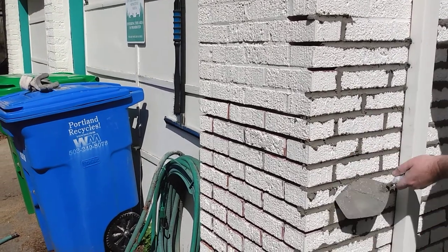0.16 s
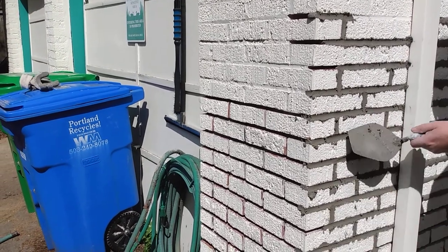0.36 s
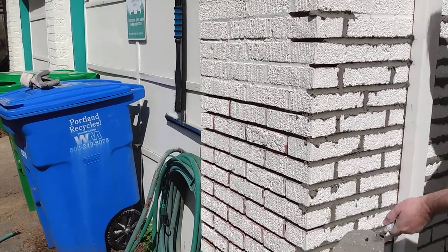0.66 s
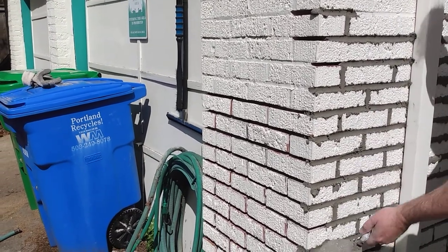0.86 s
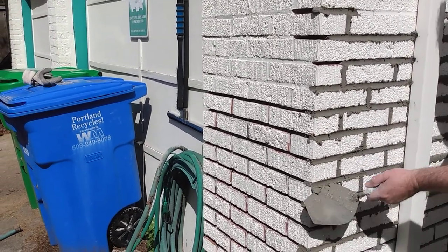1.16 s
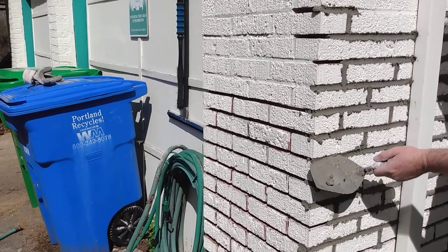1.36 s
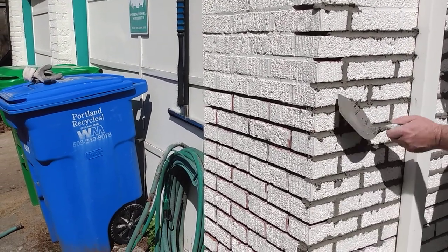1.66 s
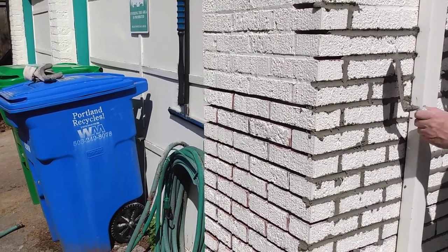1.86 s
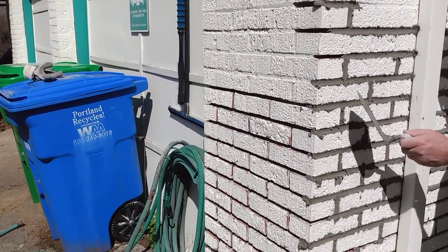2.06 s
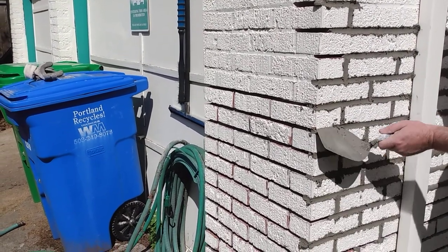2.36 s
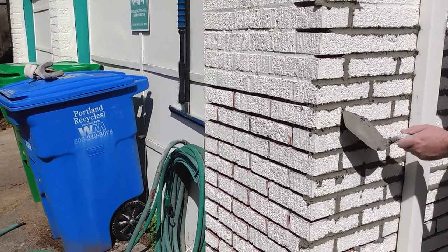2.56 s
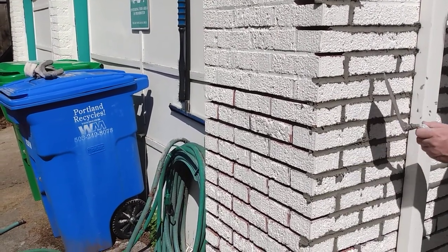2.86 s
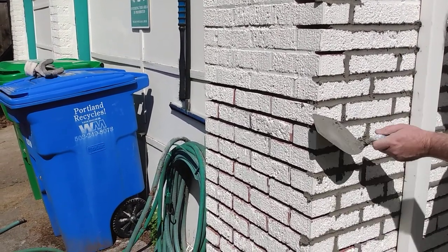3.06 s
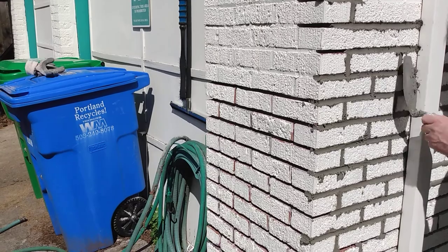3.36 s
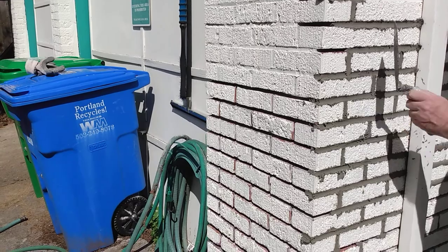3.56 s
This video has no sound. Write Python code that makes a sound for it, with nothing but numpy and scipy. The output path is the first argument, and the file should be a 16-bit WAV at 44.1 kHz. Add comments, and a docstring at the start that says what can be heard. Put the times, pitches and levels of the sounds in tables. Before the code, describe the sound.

A steel trowel scrapes hard mortar at once, hissing grittily, with a sharp catch near 0.36 s. Short strokes with clicks and quick metallic rings follow from 0.9 to 1.4 s and 1.55 to 1.9 s. After a short lull, scrapes resume at 2.3 to 2.85 s. Another lull leads to the loudest rasp around 3.25-3.45 s, then loose mortar slides off. Faint distant traffic hums throughout; close stereo, outdoors.

```python
"""A gritty hiss starts at once: a steel trowel scrapes mortar joints of a brick wall outdoors, in short strokes.
Random breaking sand grains make the hiss and also drive the modes of the blade. At each catch on a lump
the grinding jumps up and the blade rings short and clear, as decaying sine tones. Near the end loose mortar
slides off, as noise through two fading resonances. Far traffic, made of filtered noise, hums underneath."""
import sys
import numpy as np
from scipy import signal
from scipy.fft import rfft, irfft, next_fast_len
from scipy.io import wavfile
from scipy.ndimage import uniform_filter1d

SR = 44100
rng = np.random.default_rng(int(sys.argv[2]) if len(sys.argv) > 2 else 0)


def natural_amplitude(level_db):
    """Convert a level in decibels to a linear amplitude factor, elementwise."""
    exponent = np.asarray(level_db, float) / 20
    return 10 ** exponent


def unload_audio(sound):
    """Save the sound as a 16-bit wav file, at the path given as the first command line argument."""
    columns = np.transpose(np.atleast_2d(sound))
    # keep every value between -1 and 1, then stretch to whole-number steps
    steps = np.round(np.clip(columns, -1, 1) * 32767)
    wavfile.write(sys.argv[1], SR, steps.astype(np.int16))


N = 163170  # length [samples]

# Far traffic wash, its tone colour: (frequency [Hz], relative level [dB])
WASH_COLOUR = [(18, -57), (30, -16), (71, 0), (184, -14), (866, -15), (1540, -27.5), (7000, -52),
               (10500, -44), (13700, -49), (16000, -52)]
# How alike the wash is left and right: (frequency [Hz], likeness [0 to 1])
WASH_LIKENESS = [(70, .7), (200, .9), (600, .6), (1500, .1)]
WASH_DB = -51.5
HUM_HZ, HUM_WIDTH_HZ, HUM_DB = 66, 12, -57  # an engine idles far off

# Trowel level at the two microphone ports: (frequency [Hz], left minus right [dB])
PORT_LEAN = [(60, 5), (380, -2), (2380, 5), (9000, -5.5), (14000, -1)]
# Trowel phase at the two ports: (frequency [Hz], lead of the left port [radians])
PORT_LEAD = [(520, .3), (1250, 1.9), (2500, 1.4), (3450, 3.1), (4050, 5.1), (5430, 6), (8610, 4.6),
             (12000, 5.6), (16000, 8)]
ECHO_DB, ECHO_T60_S, ECHO_START_S = -6.5, .03, .0015

# Loose mortar sliding off the blade: (frequency [Hz], width [Hz], level [dB], time to fade 60 dB [s])
MORTAR_FALL = [(1100, 700, -44, .2), (1900, 1200, -44, .1)]
FALL_S, FALL_RISE_S = 3.483, .004

# Strokes, each a list of points: (time [s], grit hiss [dB], blade ring over grit [dB])
STROKES = [
    [(0, -47.5, 8.5), (.27, -48, 8.5), (.31, -61.5, 18), (.44, -63.5, 15)],
    [(.452, -56, 4.5), (.53, -57.5, 5), (.54, -69.5, -19), (.92, -75.5, -24)],
    [(.925, -57, -0.5), (1.0, -52, 10), (1.2, -71.5, 22.5), (1.42, -57.5, 7.5), (1.52, -62.5, -4)],
    [(1.545, -75.5, 20.5), (1.75, -53, 8), (1.83, -37, -2.5), (1.88, -66.5, 18.5), (1.97, -76, 15.5)],
    [(1.985, -65, 0), (2.01, -56, -22.5), (2.1, -96, 21)],
    [(2.325, -56, 0), (2.42, -49, 8), (2.525, -45, -13), (2.545, -66, 18.5), (2.61, -43, 3),
     (2.72, -79, 13.5)],
    [(2.725, -100, -3), (2.76, -61.5, 22.5), (2.82, -59.5, 20), (2.88, -84, 11)],
    [(3.24, -67, 17), (3.3, -47.5, 11.5), (3.4, -30.5, 3), (3.44, -33.5, 2), (3.47, -58.5, 20.5),
     (3.5, -66, 10)],
]
# How the blade lies on the wall, one row a stroke, against the middle modes:
# (low modes [dB], top modes [dB], low bending [dB], grit treble [dB])
GRIPS = [(0.5, -22.5, -2.5, -3), (-3, -0.5, 3, -0.5), (6.5, -31, -1.5, -1.5), (0, -12, -2, 0.5),
         (22, -4, 9, 9.5), (1.5, -4.5, -3, 7.5), (1.5, -13.5, -14, -6.5), (3.5, -7.5, -12, -5.5)]
# Pitches between which the grip blends from low modes to top modes: (frequency [Hz])
GRIP_HZ = (1200, 1772, 2600, 3800)
# The edge catches on a lump: (time [s], crack [dB], ring over crack [dB],
# time for the crumble to fade 60 dB [s], pitch of the modes struck most [Hz])
CATCHES = [(0.1341, -32.5, -3, 0.046, 1772), (0.2057, -38, 6, 0.061, 1772),
           (0.2782, -29.5, -6.5, 0.034, 2480), (0.3298, -34, -1.5, 0.032, 3830),
           (0.3594, -23, -1, 0.025, 1772), (0.359, -38.5, 15.5, 0.029, 1066), (0.9313, -33, -4, 0.03, 4430),
           (0.9863, -40, 8, 0.079, 1820), (1.012, -41.5, 16.5, 0.013, 1740), (1.0246, -29, 6, 0.013, 1762),
           (1.0549, -34.5, 1.5, 0.036, 2500), (1.0994, -40.5, 10, 0.028, 1770),
           (1.1353, -41, 12, 0.058, 1208), (1.1722, -35.5, -5, 0.036, 2438),
           (1.228, -30.5, -10, 0.037, 2380), (1.242, -47, 17, 0.071, 1794), (1.285, -34, -6.5, 0.029, 2460),
           (1.3256, -41.5, 9, 0.025, 1772), (1.364, -50, 16.5, 0.038, 1772),
           (1.4082, -39.5, 5.5, 0.15, 1800), (1.5494, -47.5, 11.5, 0.052, 2380),
           (1.5919, -28.5, 1, 0.023, 4420), (1.626, -43, 3.5, 0.1, 2438), (1.6796, -44.5, -7, 0.12, 4150),
           (1.71, -39, -1.5, 0.03, 4150), (1.732, -39.5, 5, 0.041, 1772), (1.7654, -28, -24, 0.025, 2480),
           (1.795, -34, -1.5, 0.14, 2410), (1.853, -29, -5, 0.034, 2390), (1.897, -32.5, 2.5, 0.036, 1070),
           (2.326, -38.5, -30, 0.02, 1772), (2.356, -44, -12, 0.21, 1772), (2.4038, -28, -27, 0.06, 2500),
           (2.5501, -38, -4, 0.049, 2600), (2.7265, -42.5, 4, 0.028, 1772), (2.754, -29.5, 8, 0.024, 1816),
           (2.7782, -34, 9, 0.059, 2500), (2.793, -39, 13.5, 0.02, 1200), (2.809, -26.5, 2, 0.024, 2536),
           (2.814, -40, 16.5, 0.02, 1157), (3.1794, -46.5, 10.5, 0.14, 1850),
           (3.245, -30, -0.5, 0.049, 5800), (3.2817, -28, -15, 0.034, 5800),
           (3.3198, -29.5, -4, 0.027, 2438), (3.35, -35.5, 4.5, 0.023, 2438),
           (3.3932, -24, 1.5, 0.013, 2405), (3.4188, -23.5, -7.5, 0.027, 4770),
           (3.431, -25.5, 6, 0.037, 1222), (3.486, -41, 13.5, 0.052, 1170)]
CATCH_RISE_S, GRIND_DB = .00023, -3  # start of the crack; grinding drive of the ring after it

# Grit hiss, its tone colour: (frequency [Hz], relative level per Hz [dB])
GRIT_COLOUR = [(880, -51), (1500, -9), (2940, 4), (8080, -5.5), (14100, 3), (16000, -5.5)]
GRAINS_PER_S, GRAIN_SPREAD_DB = 9000, 2.5
CLUMP_DB, CLUMP_S = 4.2, .006
TREBLE_HZ = 7900  # the grip tilts the grit around here
ALONG_EDGE_DB = -5  # grit breaking elsewhere along the edge

# Blade modes: (frequency [Hz], level [dB], time to fade 60 dB when free [s])
BLADE_MODES = [(1104, -9, .45), (1200, -3, .13), (1555, -7, .12), (1772, 2, .15), (2020, -7, .07),
               (2304, -10, .18), (2438, -5, .13), (2620, -9, .09), (2995, -5, .06), (3285, -2, .1),
               (3848, -6, .07), (4150, -6, .07), (4770, -6, .04), (5800, -4, .035)]
# Low bending of the blade, damped by the hand: (frequency [Hz], width [Hz], level [dB])
BENDING_MODES = [(447, 213, 11), (594, 75, -2.5), (659, 26.7, 4)]
PRESS_LOSS = .03  # extra width of each mode against the wall, as a share of its pitch
WANDER_DB, WANDER_S = 5., .025  # modes swell and fade as the contact point slides
KNOCK_S = .00036  # time constant of the start of a struck ring
STRIKE_OCTAVES, OTHERS_DB = .04, -13  # reach of a catch around its pitch; level of the other modes
STOP_T60_S, REST_S = .02, .011  # the next catch, if later than REST_S, stops the ring

BAND_TOP_HZ = 15900  # top of the microphone's range


def evened(x):
    """Scales a signal to an average (RMS) strength of one."""
    return x / np.sqrt(np.mean(x ** 2) + 1e-20)


def read(points, hz):
    """Reads a curve between its points, on a logarithmic pitch scale."""
    f, value = np.transpose(points)
    return np.interp(np.log(hz + 1), np.log(f + 1), value)


def coloured(x, gain):
    """Applies a gain given per frequency."""
    size = next_fast_len(N + 4096)
    spectrum = rfft(x, size) * gain(np.fft.rfftfreq(size, 1 / SR))
    return irfft(spectrum, size)[..., :N]


def mode(x, hz, width):
    """Two-pole resonance, scaled to roughly keep the power of white noise."""
    r = np.exp(-np.pi * width / SR)
    turn = 2 * np.pi * hz / SR
    gain = np.sqrt(2 * (1 - r * r)) * np.sin(turn)
    return gain * signal.lfilter([1], [1, -2 * r * np.cos(turn), r * r], x)


def yard():
    """Far traffic: noise partly shared by left and right, and narrow noise that wavers as a low hum."""
    a, b, c, d = rng.standard_normal((4, N))

    def wash(f):
        return natural_amplitude(read(WASH_COLOUR, f))

    def same(f):
        return np.clip(read(WASH_LIKENESS, f), -1, 1)

    left = coloured(a, wash)
    shared = coloured(a, lambda f: wash(f) * same(f))
    own = coloured(b, lambda f: wash(f) * np.sqrt(1 - same(f) ** 2))
    pair = np.array([left, shared + own])
    hum = mode(np.array([c + .45 * d, c - .45 * d]), HUM_HZ, HUM_WIDTH_HZ)
    hum = coloured(hum, lambda f: f ** 2 / (f ** 2 + 50. ** 2))
    return natural_amplitude(WASH_DB) * evened(pair) + natural_amplitude(HUM_DB) * evened(hum)


def ports(x):
    """Two microphone ports: they differ in phase and level, and hear scattered echoes from wall and ground."""
    left = coloured(x, lambda f: natural_amplitude(read(PORT_LEAN, f) / 2) * np.exp(.5j * read(PORT_LEAD, f)))
    right = coloured(x, lambda f: natural_amplitude(-read(PORT_LEAN, f) / 2) * np.exp(-.5j * read(PORT_LEAD, f)))
    u = np.arange(SR // 5) / SR
    taps = rng.choice([-1., 1.], (2, len(u))) * (rng.random((2, len(u))) < .06)  # sparse echoes
    taps *= (u > ECHO_START_S) * natural_amplitude(-60 * u / ECHO_T60_S)
    taps /= np.linalg.norm(taps, axis=1, keepdims=True)
    bright = coloured(x, lambda f: f ** 2 / (f ** 2 + 700. ** 2))  # echoes lack bass
    echoes = signal.fftconvolve(bright[None], taps, axes=1)[:, :N]
    return np.array([left, right]) + natural_amplitude(ECHO_DB) * echoes


def falling(sand):
    """Loose mortar slides off: grain noise in two resonances, of which the brighter dies first."""
    u = np.maximum(np.arange(N) / SR - FALL_S, 0)
    body = sum(natural_amplitude(db - 60 * u / t60) * mode(sand, f, width) for f, width, db, t60 in MORTAR_FALL)
    return np.minimum(u / FALL_RISE_S, 1) * body


def grains():
    """Random sand grains breaking, in clumps; two unlike streams."""
    breaks = rng.random((2, N)) < GRAINS_PER_S / SR
    size = natural_amplitude(GRAIN_SPREAD_DB * np.minimum(rng.exponential(1, (2, N)), 4)) * breaks
    clump = evened(uniform_filter1d(rng.standard_normal(N), round(CLUMP_S * SR)))
    return evened((size + .2) * rng.standard_normal((2, N)) * natural_amplitude(CLUMP_DB * clump))


def contact():
    """Strength of grit and ring drive over time, where strokes and catches add as power; and the grip."""
    t, power, grip = np.arange(N) / SR, np.zeros((2, N)), np.zeros((4, N))
    for stroke, hold in zip(STROKES, GRIPS):
        s, grit, ring = np.transpose(stroke)
        on = (t >= s[0]) & (t < s[-1])
        power[:, on] += [natural_amplitude(2 * np.interp(t[on], s, db)) for db in (grit, grit + ring)]
        grip[:, t >= s[0]] = np.array(hold)[:, None]  # holds until the next stroke
    for s, db, ring, t60, _ in CATCHES:
        start = round(s * SR)
        u = t[start:][:SR // 4] - s
        crumble = np.clip(u / CATCH_RISE_S, 0, 1) * natural_amplitude(db - 60 * u / max(t60, .005))
        share = natural_amplitude(np.array([[0], [ring + GRIND_DB]]))
        power[:, start:][:, :len(u)] += (share * crumble) ** 2
    return np.sqrt(power), grip


def grit_hiss(grit, treble, sand):
    """Breaking grains heard directly; the grip tilts their treble against the rest."""
    hz = np.fft.rfftfreq(4096, 1 / SR)
    counted = (hz > 4500) * (hz < BAND_TOP_HZ)  # the hiss level refers to this range
    norm = np.sqrt(np.mean(natural_amplitude(2 * read(GRIT_COLOUR, hz)) * counted))

    def colour(f):
        return natural_amplitude(read(GRIT_COLOUR, f)) / norm

    def dull(f):
        return 1 / (1 + (f / TREBLE_HZ) ** 4)

    dark = coloured(grit * sand / natural_amplitude(treble / 2), lambda f: colour(f) * dull(f))
    bright = coloured(grit * sand * natural_amplitude(treble / 2), lambda f: colour(f) * (1 - dull(f)))
    return dark + bright


def pressed_ring(ring, low, top, rub):
    """Rubbing drives the blade modes, which the wall damps and the grip favours unequally."""
    out = np.zeros(N)
    total = np.sqrt(sum(natural_amplitude(2 * row[1]) for row in BLADE_MODES))
    span = round(WANDER_S * SR)
    for f, db, t60 in BLADE_MODES:
        low_share = np.interp(f, GRIP_HZ, [1, 0, 0, 0])
        top_share = np.interp(f, GRIP_HZ, [0, 0, 0, 1])
        slow = uniform_filter1d(uniform_filter1d(rng.standard_normal(N), span), span)
        drive = ring * rub * natural_amplitude(low_share * low + top_share * top + WANDER_DB * evened(slow))
        width = np.log(1000) / np.pi / t60 + PRESS_LOSS * f
        out += natural_amplitude(db) / total * mode(drive, f, width)
    return out


def bending(drive):
    """Low bending of the blade: rubbing drives broad resonances, damped by the hand."""
    total = np.sqrt(sum(natural_amplitude(2 * row[2]) for row in BENDING_MODES))
    return sum(natural_amplitude(db) / total * mode(drive, f, width) for f, width, db in BENDING_MODES)


def strikes():
    """Each catch strikes the modes near its pitch; they ring freely until a later catch stops them."""
    out = np.zeros(N + SR)
    f, mode_db, t60 = np.transpose(BLADE_MODES)[:, :, None]
    times = np.array([row[0] for row in CATCHES] + [N / SR])
    chance = rng.random((len(CATCHES), 2, len(BLADE_MODES), 1))
    for (s, db, ring, _, hz), (turn, luck) in zip(CATCHES, chance):
        free = times[times > s + REST_S][0] - s
        u = np.arange(0, min(free + STOP_T60_S, .4), 1 / SR)
        near = np.exp(-.5 * (np.log2(f / hz) / STRIKE_OCTAVES) ** 2)
        share = near + luck * natural_amplitude(mode_db + OTHERS_DB)
        fade = natural_amplitude(db + ring - 60 * u / t60 - 60 * np.maximum(u - free, 0) / STOP_T60_S)
        tones = share * fade * np.sin(2 * np.pi * (f * u + turn))
        out[round(s * SR):][:len(u)] += (1 - np.exp(-u / KNOCK_S)) * tones.sum(0)
    return out[:N]


def trowel():
    """Adds up grit hiss, rings, bending and falling mortar; second result: grit along the edge."""
    (grit, ring), (low, top, flex, treble) = contact()
    sand = grains()
    rub = evened(sand + rng.standard_normal((2, N)))  # the edge feels grains and steady rubbing
    hiss, along = grit_hiss(grit, treble, sand)
    bright = hiss + pressed_ring(ring, low, top, rub[0]) + strikes()
    deep = bending(ring * natural_amplitude(flex) * rub[1]) + falling(rub[1])
    # the small blade radiates little bass
    thin = coloured(bright, lambda f: f ** 4 / (f ** 4 + 850. ** 4))
    near = thin + coloured(deep, lambda f: f ** 4 / (f ** 4 + 220. ** 4))
    return near, along


def scene():
    """The trowel at both ports, grit along the edge in opposite sign left and right, and the yard."""
    near, along = trowel()
    return ports(near) + natural_amplitude(ALONG_EDGE_DB) * np.array([along, -along]) + yard()


def low_pass(x):
    """Removes everything above the highest recorded frequency."""
    return signal.sosfilt(signal.butter(12, 16990, fs=SR, output="sos"), x)


def record(dry):
    """The microphone cuts the deepest bass and everything above its range."""
    bass_cut = signal.butter(3, 38, "high", fs=SR, output="sos")
    band_limit = signal.firwin(255, BAND_TOP_HZ, window=("kaiser", 5), fs=SR)
    mix = signal.sosfilt(bass_cut, dry)
    mix = signal.oaconvolve(mix, band_limit[None], "same")
    return low_pass(mix)


dry = scene()
out = record(dry)
unload_audio(out)
```